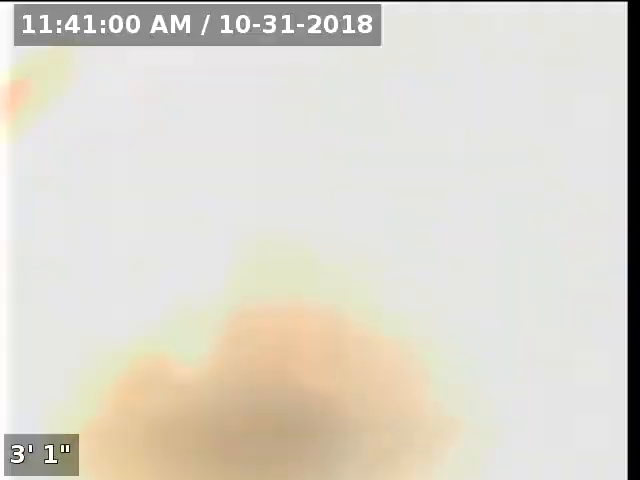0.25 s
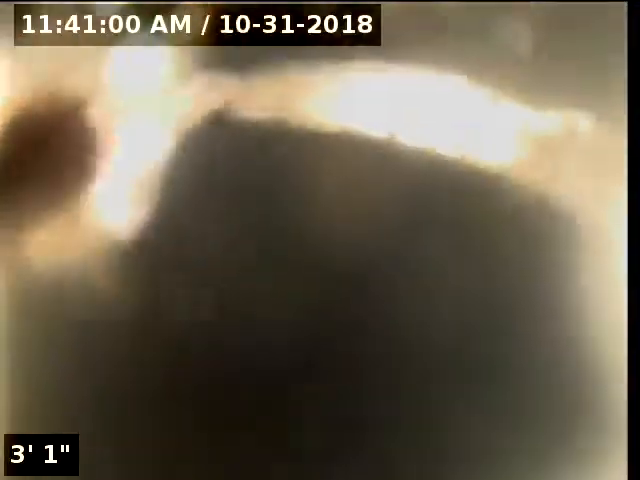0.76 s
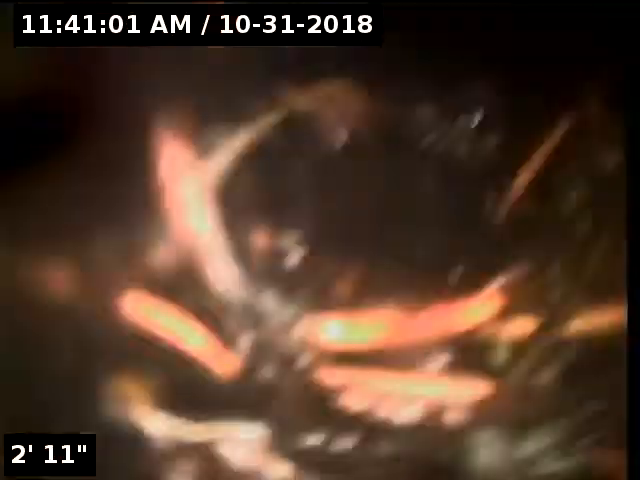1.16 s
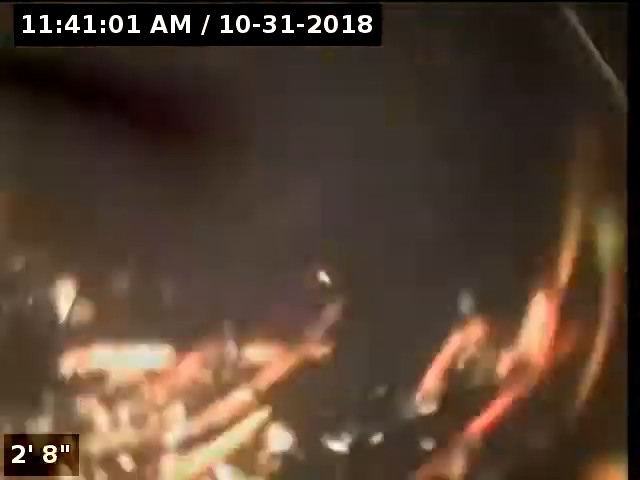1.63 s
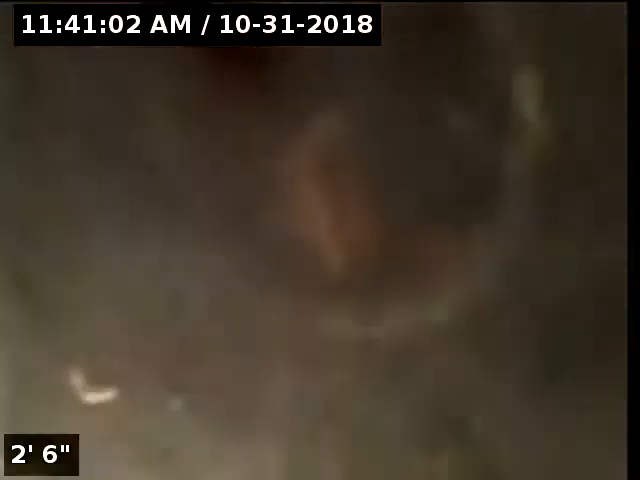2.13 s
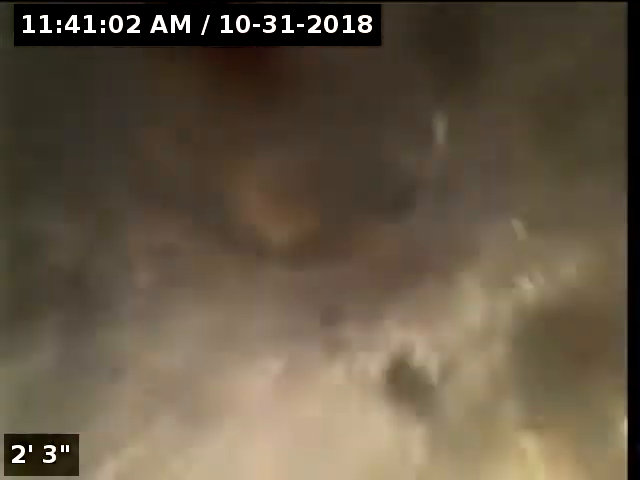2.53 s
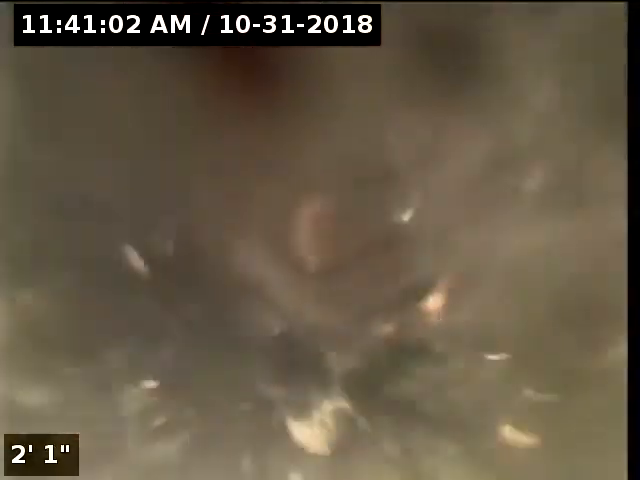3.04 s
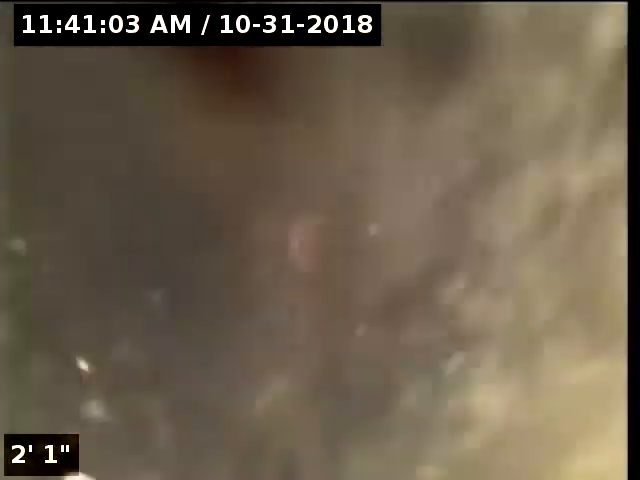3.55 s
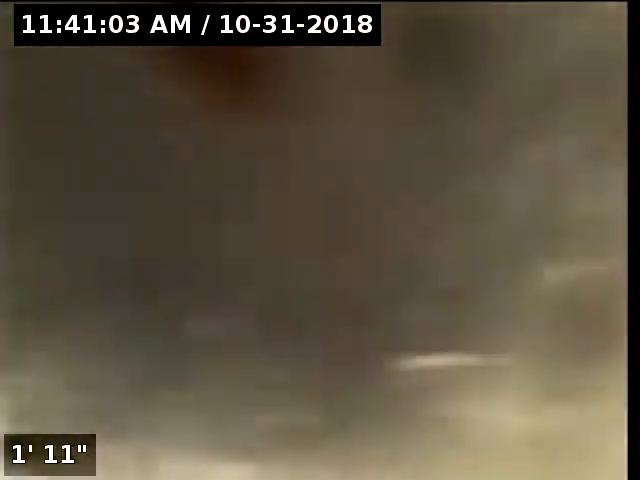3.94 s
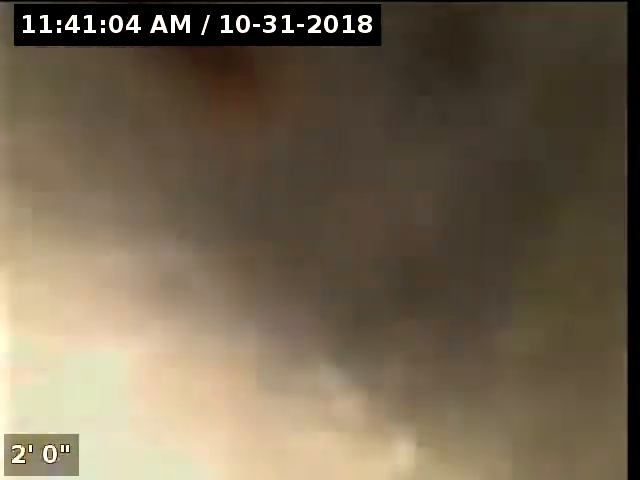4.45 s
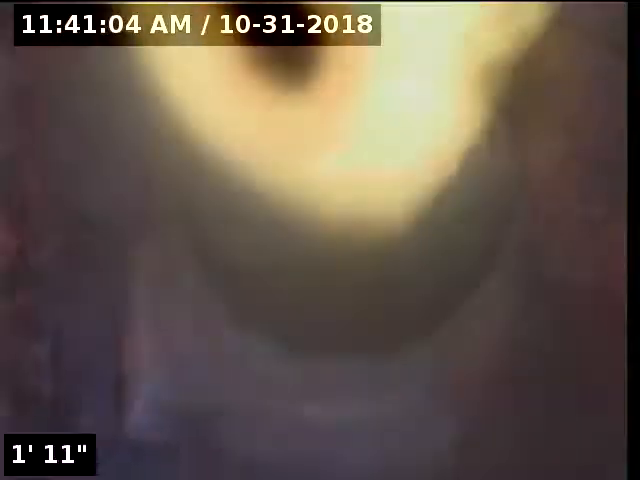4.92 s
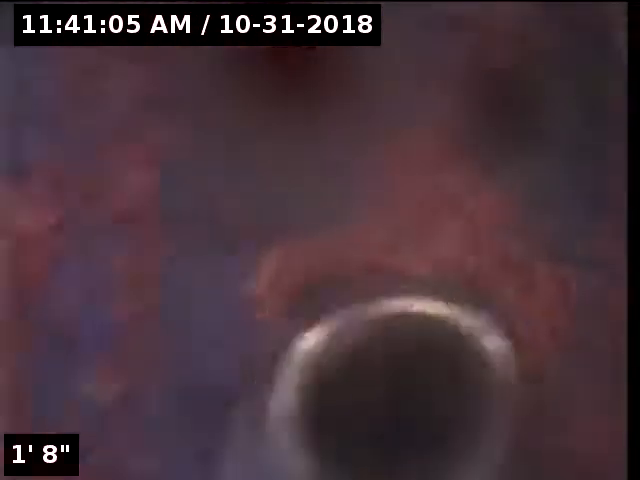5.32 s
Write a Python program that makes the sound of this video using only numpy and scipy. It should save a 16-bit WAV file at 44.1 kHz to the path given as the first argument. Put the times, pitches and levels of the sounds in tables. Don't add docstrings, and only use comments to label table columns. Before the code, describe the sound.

A stiff cable is pulled quickly through a narrow hollow pipe, picked up closely by a small, muffled microphone with low hum, rumble and light hiss. Loud, clipped, boxy knocks come at 0.22, 0.26 and 0.57 seconds, with smaller bumps around them and a dry, bright tick on the first; a dull bump follows at 0.65. Scraping eases, then grows rough near 1.2, with hard catches at 1.4 and 1.7. It drags again around 2.3, another strong clonk lands at 2.6, and friction drops very low near 3.0 to 3.25. A rub swells to 3.6, with a tiny electronic click at 3.55 and a soft knock at 3.67. A deep bump at 4.0 leads to heavy knocks around 4.2. A faint, slowing run of creaky ticks spans 4.46 to 4.63. Scraping returns near 4.9, a last moderate bump sounds at 5.2, and the drag eases until about 5.6.

```python
import sys
import numpy as np
from scipy import signal
from scipy.fft import rfft, irfft
from scipy.io import wavfile
from scipy.ndimage import uniform_filter1d, minimum_filter1d

SR = 44100
rng = np.random.default_rng(int(sys.argv[2]) if len(sys.argv) > 2 else 0)


def gain_from_db(level_db):
    decades = np.asarray(level_db, float) / 20
    return 10 ** decades


def wrap_up_sound(samples):
    columns = np.atleast_2d(samples).T
    tamed = np.clip(columns, -1, 1)
    steps = np.round(tamed * 32767).astype(np.int16)
    wavfile.write(sys.argv[1], SR, steps)


N = 246068
SHELL_HZ, DEEP_HZ, UPPER_HZ, HIGH_HZ = 260, 500, 900, 1400
SHEATH_CUT_HZ = 2090
NOTCH_HZ, NOTCH_WIDTH_HZ = 3920, 2000


def rms_one(x):
    return x / np.sqrt(np.mean(x ** 2) + 1e-20)


def drift(rate_hz):
    r = np.exp(-2 * np.pi * rate_hz / SR)
    noise = rng.standard_normal(N + SR)
    return rms_one(signal.lfilter([1], [1, -2 * r, r * r], noise)[SR:])


def resonate(x, hz, width_hz):
    r = np.exp(-np.pi * width_hz / SR)
    zeros = np.array([1, 0, -1]) * (1 - r * r) / 2
    poles = [1, -2 * r * np.cos(2 * np.pi * hz / SR), r * r]
    return signal.lfilter(zeros, poles, x + 1e-18)


def grit(per_s, spread_db):
    sizes = gain_from_db(spread_db * np.minimum(rng.exponential(1, N), 4)) * rng.choice([-1, 1], N)
    return rms_one(sizes * (rng.random(N) < per_s / SR))


def blunt(catches):
    return signal.sosfilt(signal.butter(4, SHEATH_CUT_HZ, fs=SR, output="sos"), catches)


def after(events, t60_s):
    jumps = np.zeros(N)
    jumps[[round(s * SR) for s, db in events]] = gain_from_db(np.array(events)[:, 1])
    return signal.lfilter([1], [1, -gain_from_db(-60 / (t60_s * SR))], jumps)


# (time [s], level [dB])
DRAG = [(0.0, -38), (0.8, -42.5), (1.15, -33.5), (1.78, -45), (1.94, -37), (2.301, -33), (2.59, -38.5),
        (2.86, -41.5), (2.97, -52), (3.26, -53), (3.32, -41.5), (3.6, -30), (3.79, -40.5), (3.86, -48.5),
        (4.12, -43.5), (4.64, -46.5), (4.88, -32), (5.58, -38.5)]


def drag_db():
    return np.interp(np.arange(N) / SR, *np.transpose(DRAG)) + 38


# (frequency [Hz], width [Hz], scraped level [dB], knocked level [dB])
BODY_MODES = [(147.9, 16, -12, -18.5), (196.9, 8.1, -6.5, -11), (316.8, 21, -7, -20), (361.2, 15, -10, -10),
              (453.7, 28.4, 2, -10.5), (563, 63, -15.5, -13.5), (637.4, 13.4, -1, -13),
              (740.7, 20.1, 0.5, 2), (796, 37.5, -6.5, -6), (932.2, 33, -10.5, -12.5),
              (1065.4, 85, -8.5, -9.5), (1239, 50, -14.5, -17.5), (1343, 86, -15, -20.5),
              (1650.6, 25, -23, -37.5), (1750, 140, -40.5, -41), (2204, 220, -32, -38),
              (2716, 63, -60, -42.5), (2910, 56, -42, -48), (3130, 270, -47, -56.5)]


def scrape():
    drag = drag_db()
    shell_db = -48 + 0.68 * drag
    middle_db = -37.926 + drag
    rasp_db = -61.5 + 0.86 * drag
    judder = drift(25)
    catches = [blunt(grit(per_s=2500, spread_db=2.0)) for side in range(2)]
    groups = np.zeros((3, N))
    for k, (hz, width, level_db, _) in enumerate(BODY_MODES):
        flicker_db = 2.65 * (1.5 if hz < SHELL_HZ else 1) * drift(3.6)
        drive = catches[k % 2] * gain_from_db(level_db + 0.65 * judder + flicker_db)
        group = int(hz > SHELL_HZ) + int(hz > HIGH_HZ)
        groups[group] += resonate(drive, hz, width) * (-1) ** (k // 2)
    return sum(gain_from_db(db) * rms_one(g) for db, g in zip((shell_db, middle_db, rasp_db), groups))


# (time [s], peak level [dB], contact [ms], deep modes [dB])
BLOWS = [(0.077, -36, 28, 7), (0.21, -26.5, 14, -5), (0.261, -7, 3.2, 5), (0.318, -27.5, 22, 15),
         (0.444, -26, 13, -10), (0.507, -29, 26, -9), (0.568, 1, 8.7, 0.5), (0.578, -18, 6.6, 12),
         (0.59, -9, 9.3, 11), (1.241, -30.5, 14, -14), (1.506, -22.5, 9.9, 8), (1.617, -33.5, 18, 3),
         (2.303, -27, 41, -15), (2.537, -28.5, 35, 8.5), (2.643, -30, 6.4, 6), (3.673, -22.5, 17.4, 8.5),
         (3.905, -42, 10, 14), (4.203, -14.5, 10.7, 14), (4.258, -25, 11.2, 13), (4.89, -26, 15, 9),
         (5.169, -36, 15, -16)]
# (time [s], peak level [dB], deep modes [dB], upper modes [dB], shell [dB])
JOINT_BLOWS = [
    (0.225, -1, 2.5, 3.4, -2),
    (0.645, -17, 14, -3.5, -1.5),
    (1.4, -3.5, 2, -0.9, 2),
    (1.696, -3.5, 2.3, 4, 4.5),
    (2.614, -1.5, -1, -1, -1.4),
    (4.006, -24, 14, -10, 3),
    (4.186, -1.5, -0.5, -0.5, 0.5),
    (4.679, -25.5, 13, 10, 6),
    (5.212, -16, 4.5, 4.5, 8),
]


def all_knocks():
    blows = [(*row, 0, 0) for row in BLOWS]
    joints = [(s, db, 13.94, *colour) for s, db, *colour in JOINT_BLOWS]
    return sorted(blows + joints)


def rumble():
    jolts = after([(row[0], row[1] - 34.5) for row in all_knocks()], t60_s=0.59)
    level = gain_from_db(-59 + 0.6 * drag_db()) + jolts
    band = signal.butter(2, [55, 125], "band", fs=SR, output="sos")
    return gain_from_db(-7.0) * level * rms_one(signal.sosfilt(band, rng.standard_normal(N)))


# (frequency [Hz], level [dB per Hz])
HISS_SPECTRUM = [(30, -35), (60, -19), (95, 4.5), (140, -1), (260, -24.5), (460, -0.5), (780, -34.5),
                 (1200, -29.5), (2900, -37.5), (3900, -40), (5000, -38), (6500, -34), (8000, -45),
                 (8800, -49.5)]


def hiss():
    hz, db = np.transpose(HISS_SPECTRUM)
    bins_hz = np.maximum(np.arange(N // 2 + 1) * SR / N, 1)
    shape = gain_from_db(np.interp(np.log(bins_hz), np.log(hz), db))
    return gain_from_db(-49) * rms_one(irfft(rfft(rng.standard_normal(N)) * shape, N))


def knocks():
    blows = all_knocks()
    chatter = rng.standard_normal((len(blows), 100))
    out = np.zeros(N)
    t = np.arange(4000) / SR
    for k, (hz, width, _, level_db) in enumerate(BODY_MODES):
        force = np.zeros(N + 4000)
        push = 1.9 if hz < SHELL_HZ else 1
        for (s, db, contact_ms, deep_db, upper_db, shell_db), noise in zip(blows, chatter):
            phase = np.minimum(t / (push * contact_ms / 1000), 1)
            wobble = 1 + 0.21 * np.interp(t * 400, np.arange(50), noise[50:])
            shape = np.sin(np.pi * phase ** 0.99) * wobble
            colour_db = 1.2 * noise[k + 25]
            colour_db += min(deep_db, 14) * (SHELL_HZ < hz < DEEP_HZ)
            colour_db += upper_db * (UPPER_HZ < hz < SHEATH_CUT_HZ)
            colour_db += shell_db * (hz < SHELL_HZ)
            colour_db += (8.5 + 0.2 * db) * (hz > HIGH_HZ)
            swing = np.sin(2 * np.pi * hz * t + 2.4 * k ** 2 + 0.7 * noise[k])
            at = round((s - 0.0045) * SR)
            force[at:at + 4000] += gain_from_db(db + colour_db) * shape * swing
        damping = 0.7 if hz < SHELL_HZ else 1.6
        out += gain_from_db(level_db - 2.5) * resonate(force[:N], hz, width * damping)
    return out


def shudder():
    fade = after([(row[0] + 0.0023, row[1] + 6) for row in all_knocks()], t60_s=0.095)
    drive = blunt(fade * grit(per_s=4200, spread_db=-2.0))
    return gain_from_db(-1.5) * sum(gain_from_db(db) * resonate(drive, hz, width) * (-1) ** k
                           for k, (hz, width, db, _) in enumerate(BODY_MODES))


# (time [s], peak level [dB], fade t60 [ms], top band [dB])
DRY_TICKS = [(0.2074, -35.5, 160, -6), (0.227, -19.5, 62, -6), (0.26, -39.5, 94, 0.5),
             (0.304, -47.5, 130, -1), (0.332, -59.5, 61, 8.5), (0.4437, -51, 115, -8),
             (1.1772, -45, 63, -10.5), (1.559, -59, 58, 5), (1.574, -44, 58, -9), (2.202, -59, 33, 6),
             (4.2794, -56.5, 23, 1), (4.369, -61, 66, 1), (4.383, -58.5, 310, -4), (5.2126, -52, 47, -15)]
# (time [s], peak level [dB])
CREAK_RUN = [
    (4.461, -59),
    (4.4774, -62.5),
    (4.4907, -57),
    (4.508, -56.5),
    (4.5244, -62),
    (4.54, -59),
    (4.56, -57),
    (4.578, -58),
    (4.6, -57.5),
    (4.6275, -57),
]
# (frequency [Hz], width [Hz], level [dB])
TICKER_MODES = [(1300, 160, -12.5), (2370, 740, -4), (2700, 1100, -5.5), (3300, 360, -6), (5000, 770, -10),
                (6400, 1100, -10), (7500, 560, -24), (7960, 700, -32.5)]
# (frequency [Hz], width [Hz], level [dB])
TICKER_RINGS = [(1790, 120, 0), (2130, 90, 4), (5730, 300, -13), (5960, 90, -7)]


def ticks():
    t = np.arange(N) / SR
    rows = [(*row, min(-0.5, -40 - row[1])) for row in DRY_TICKS]
    rows += [(*row, 41, 2.5, 5.5) for row in CREAK_RUN]
    fades = np.zeros((2, 2, N))
    for s, db, t60_ms, top_db, ring_db in rows:
        a, b = round(s * SR), round((s + 0.3) * SR)
        since = t[a:b] - s
        bite = np.minimum(1, since / 0.0015 + 0.31).clip(0)
        fade = gain_from_db(db - 60 * since / (t60_ms / 1000)) * bite
        fades[:, :, a:b] += fade * gain_from_db(np.add.outer([0, top_db], [0, ring_db]))[:, :, None]
    fine = grit(per_s=6900, spread_db=1.0)
    out = np.zeros(N)
    for rings, modes in enumerate((TICKER_MODES, TICKER_RINGS)):
        for k, (hz, width, db) in enumerate(modes):
            drive = fine * fades[int(hz > NOTCH_HZ), rings]
            out += gain_from_db(db) * resonate(drive, hz, width) * (-1) ** k
    return gain_from_db(14.5) * out


# (time [s], peak level [dB])
STREAM_JUMP = [
    (3.554, -24),
]


def slip():
    (s, db), = STREAM_JUMP
    step = np.zeros(N)
    step[round(s * SR)] = gain_from_db(db + 3.5)
    return signal.lfilter([1], [1, -0.93], step)


def scene():
    return (scrape() + rumble() + hiss() + knocks() + shudder() + ticks())[None, :]


def top_cut(x):
    return signal.sosfilt(signal.butter(12, 8890, fs=SR, output="sos"), x)


def record(dry):
    limit, squeeze, bend, ceiling, knee = 0.455, 0.92, 1.1, 0.53, 40
    peak = uniform_filter1d(-minimum_filter1d(-np.abs(dry), size=110), size=100)
    held = dry * np.minimum(1, limit / (peak + 1e-9)) ** squeeze
    bent = np.expm1(bend * held) / bend
    loud = bent / (1 + (np.maximum(bent, 0) / ceiling) ** knee) ** (1 / knee)
    heard = loud - resonate(loud, NOTCH_HZ, NOTCH_WIDTH_HZ)
    heard = heard + slip()
    heard = signal.sosfilt(signal.cheby2(16, 80, 9350, fs=SR, output="sos"), heard)
    heard = heard * np.minimum(1, np.arange(N)[::-1] / 300)
    return top_cut(heard)


dry = scene()
out = record(dry)
wrap_up_sound(out)
```